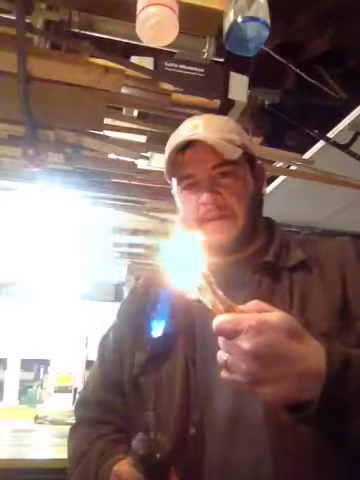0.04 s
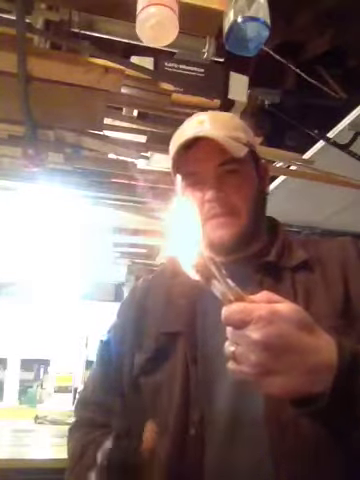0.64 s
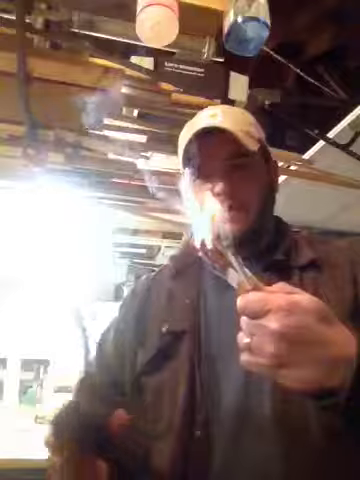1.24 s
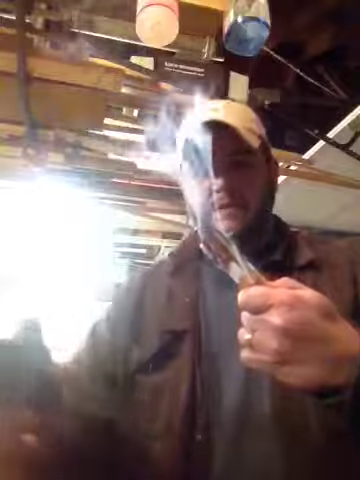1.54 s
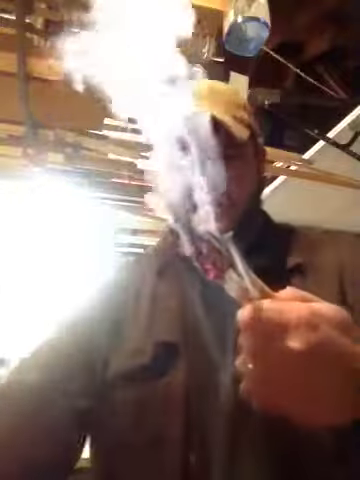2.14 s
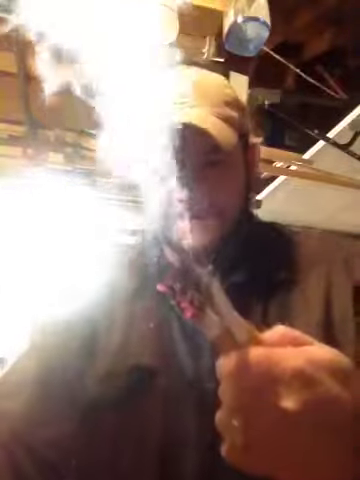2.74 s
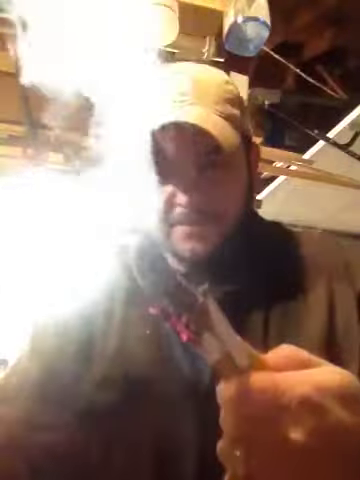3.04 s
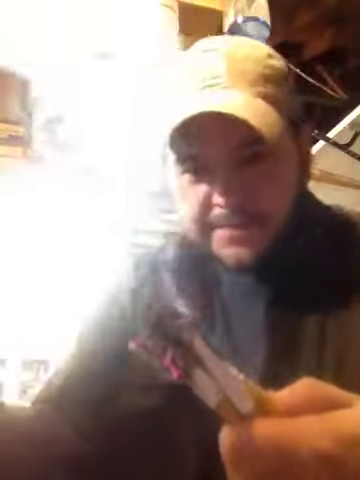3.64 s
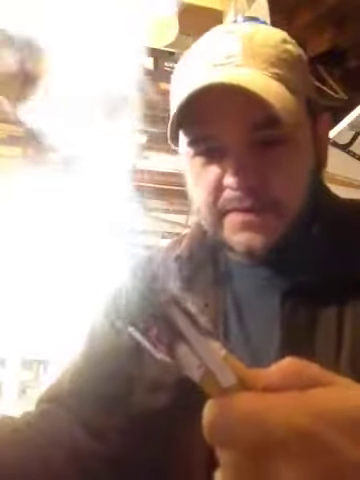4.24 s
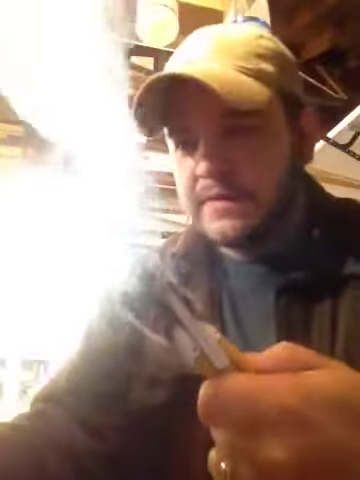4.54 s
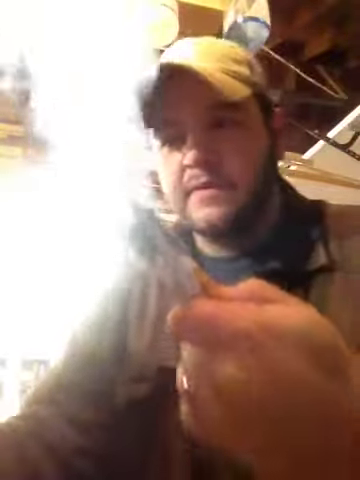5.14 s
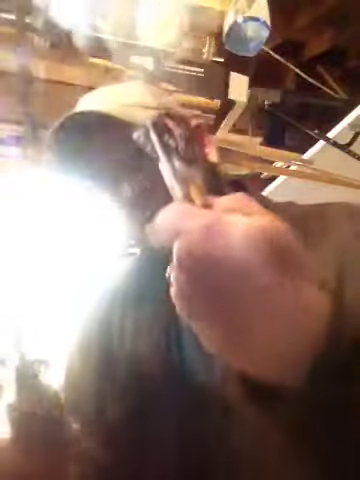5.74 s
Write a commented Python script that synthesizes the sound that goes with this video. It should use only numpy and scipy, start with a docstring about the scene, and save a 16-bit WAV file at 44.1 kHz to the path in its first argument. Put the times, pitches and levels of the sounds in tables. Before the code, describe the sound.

Close to a small microphone in a workshop, a gas torch hisses and roars for about a second, then stops with a sharp click and a brief sputter. Its metal bottle knocks down on a bench and rings briefly. A quiet stretch follows, with faintly whistling unlit gas and a few soft taps. Near the end, a knock and another sharp click bring the hissing flame back.

```python
"""A hand-held gas torch roars in a small workshop: turbulent flame below, jet hiss above.
A reflection from a nearby surface sweeps the colour of the roar as the torch is moved.
At 0.96 s the valve snaps shut; the flame pops, sputters and dies. At 2 s the steel bottle is stood
on the bench and rings. Unlit gas hisses on, faintly whistling, among small handling knocks.
At 4.78 s the igniter snaps and the flame is back."""
import sys
import numpy as np
from scipy import signal
from scipy.fft import rfft, irfft
from scipy.io import wavfile
from scipy.ndimage import uniform_filter1d

SR = 44100
rng = np.random.default_rng(int(sys.argv[2]) if len(sys.argv) > 2 else 0)


def persist_wave(psi):
    """Save psi, clipped to +-1, as 16-bit WAV."""
    counts = np.round(np.clip(psi, -1, 1) * 32767).astype(np.int16)
    wavfile.write(sys.argv[1], SR, np.atleast_2d(counts).T)


N = 254932
T = np.arange(N) / SR
HZ = np.maximum(np.fft.rfftfreq(N, 1 / SR), 1)
SHUT_S, SET_DOWN_S, RELIT_S = 0.96, 2.0155, 4.777

# flame spectra, torch lifted and lowered: f/Hz, level/dB
LIFTED_SPECTRUM = [(40, -8), (90, -32.5), (170, -12.5), (280, 1.5), (390, -14.5), (500, -5), (620, -4),
                   (900, 1), (1200, -6), (2600, -13), (4400, -6.5), (8700, -12.5), (10200, -23.5),
                   (15000, -34)]
LOWERED_SPECTRUM = [(40, -27), (90, -31), (180, -5.5), (290, -3), (390, -8.5), (540, 7), (780, 0),
                    (1000, -3), (2100, -3.5), (2700, -5.5), (4400, -8.5), (8400, -16), (10200, -23),
                    (15000, -29)]
# flame peaks and dips, of the burner and of each position: f/Hz, width/Hz, gain/dB
BURNER_PEAKS = [(3293, 164, 8.5), (3690, 200, 3), (4660, 200, 3.5), (5090, 490, -6.5), (6770, 250, 1),
                (8900, 300, -0.5), (11620, 900, 4)]
LIFTED_PEAKS = [(1500, 130, -1.5), (1570, 182, 8.5), (2800, 200, -1.5), (3300, 97, -15.5), (5020, 140, -2)]
LOWERED_PEAKS = [(1330, 150, -2), (2244, 310, 8), (5770, 440, -12)]
# near reflection as the torch swings in each burn: t/s, lag/ms
FIRST_SWING = [(0, 1.11), (0.12, 1.06), (0.3, 0.97), (0.6, 0.95), (0.75, 0.858), (0.94, 0.86)]
SECOND_SWING = [(4.8, 0.65), (5.0, 0.7), (5.16, 0.73), (5.34, 0.65), (5.43, 0.69), (5.59, 0.91),
                (5.78, 0.94)]
# hiss swells, nozzle towards the listener: t/s, half length/s, gain/dB
SWISHES = [(0.047, 0.21, 2.5), (0.8, 0.14, 2.5), (5.172, 0.045, 1.5), (5.408, 0.11, 1.5)]

# valve and igniter snaps: t/s, crack/dB, ring/dB, pop/dB
SNAPS = [(0.9549, -8.5, -29.5, -20), (4.7806, -10, -49, -29)]
# trigger clicks: t/s, click/dB, ring/dB
CLICKS = [(1.099, -42.5, -80), (1.1267, -27, -48), (4.961, -26.5, -66)]
# bottle rocking on the bench: t/s, level/dB
ROCKING = [(2.0185, 3), (2.031, 1), (2.062, -4.5)]
# handling knocks: t/s, level/dB, resonance/Hz, t60/s
KNOCKS = [(2.30, -52, 269, 0.086), (2.438, -57, 2500, 0.046), (2.632, -47.5, 1560, 0.026),
          (2.954, -55, 625, 0.08), (3.301, -48.5, 748, 0.056), (3.416, -49, 814, 0.037),
          (3.42, -50.5, 220, 0.12), (3.466, -50.5, 260, 0.16), (3.495, -55, 656, 0.055),
          (4.708, -37, 1500, 0.037), (4.711, -38, 738, 0.062), (4.762, -48, 906, 0.099)]
# rubs and spits: t/s, half length/s, level/dB, f/Hz, half width/Hz
RUBS = [(0.776, 0.011, -42.5, 12300, 704), (3.064, 0.04, -55.5, 2400, 2000)]
# impact spectra: f/Hz, level/dB
SNAP_SPECTRUM = [(50, -39), (200, -20.5), (900, -4), (1500, 0), (2600, -5.5), (4000, -2.5), (5800, 0.5),
                 (7400, -3), (8800, 0.5), (10500, -8), (14500, -12)]
CLICK_SPECTRUM = [(150, -36), (400, -17.5), (800, -10.5), (1350, -1), (2400, -9), (4600, -5.5),
                  (7000, -9.5), (11000, -18), (15000, -33)]
CONTACT_SPECTRUM = [(40, -40), (130, -12), (300, 0), (700, 8), (1100, 0), (1700, 7.5), (2800, -6.5),
                    (4200, 8), (6500, -11), (10000, -11.5), (15000, -42)]
BENCH_SPECTRUM = [(60, -36), (150, -11.5), (230, -5), (305, 2.5), (390, -17), (650, -13.5), (1200, -41),
                  (4000, -44)]
KNOCK_SPECTRUM = [(100, -27), (230, 5.5), (450, -3.5), (800, -1.5), (1600, -0.5), (2400, -14), (4500, -6.5),
                  (12000, -35)]
# modes of the struck parts and the flame's pop: f/Hz, level/dB, t60/s
VALVE_MODES = [(3640, -3.5, 0.25), (3660, -8.5, 0.42), (5100, -11, 0.24), (5970, -9, 0.18),
               (7100, -3, 0.16), (9450, -8.5, 0.18)]
SPRING_MODES = [(3260, 2.5, 0.52), (3450, -11, 0.74), (3380, -11, 0.74), (4700, 3, 0.15), (7800, -14, 0.25)]
BOTTLE_MODES = [(241, -11.5, 0.64), (289, -3.5, 0.35), (494, -27, 0.84), (1003, -16.5, 1.9),
                (2130, -29, 1.5), (3305, -19, 0.38), (5389, -15, 0.22)]
POP_MODES = [(172, -13.5, 0.044), (186, -13, 0.207), (242, 9, 0.032), (304, -3.5, 0.053), (485, 4, 0.027)]

# unlit gas spectrum: f/Hz, level/dB
LEAK_SPECTRUM = [(300, -22), (700, -13), (1500, -12), (2000, -16.5), (3200, -12), (3800, -6.5),
                 (4500, -7.5), (6200, -2.5), (7200, 1), (8400, 0), (9400, -7), (12000, -8.5), (13500, -9),
                 (15000, -19.5)]
# peaks and dips of the open tube: f/Hz, width/Hz, gain/dB
TUBE_PEAKS = [(6470, 230, -3), (7580, 302, 1), (8240, 210, 1), (10670, 440, 4.5), (10800, 230, -13.5),
              (11580, 500, 6)]
# tube whistles: f/Hz, half width/Hz, level/dB, waver/dB
WHISTLES = [(1242, 61, -67, 1.7), (2492, 69, -71, 2.4), (3783, 93, -68, 2.5), (5390, 83, -75, 3)]
# still workshop air: f/Hz, level/dB
AIR_SPECTRUM = [(25, -5.5), (60, 14.5), (110, 1), (170, 2.5), (260, -5.5), (420, -9), (800, -12),
                (2000, -41)]


def flame(flutter_db=0.77, flicker_db=0.5, crossover_hz=4000, lift_per_ms=1.25):
    """Turbulent roar and jet hiss; level, colour and reflection follow the torch's position."""
    lag_ms, = curve(FIRST_SWING + SECOND_SWING)
    base_lift = np.where(T < RELIT_S, 0.72, 0.2)  # 0 lowered, 1 lifted
    lift = np.clip(base_lift + lift_per_ms * (lag_ms - 0.8), 0, 1)
    flame_db = -34.5 + 3.5 * lift
    swish_db = sum(db * swell(s, half_s) for s, half_s, db in SWISHES)
    jet_db = -4.5 - 5.5 * lift + swish_db  # relative to the roar
    lifted = colour(noise(), LIFTED_SPECTRUM, BURNER_PEAKS + LIFTED_PEAKS)
    lowered = colour(noise(), LOWERED_SPECTRUM, BURNER_PEAKS + LOWERED_PEAKS)
    lowered = lowered + 0.3 * echo(lowered, lag_ms / 5)  # very short bounce: broad swish
    turbulence = rfft(np.sqrt(lift) * unit(lifted) + np.sqrt(1 - lift) * unit(lowered))
    lowpass = 1 / (1 + (HZ / crossover_hz) ** 8)
    roar = steady(irfft(turbulence * lowpass, N)) * undb(flutter_db * wander(35))
    jet = steady(irfft(turbulence * (1 - lowpass), N)) * undb(jet_db + flicker_db * wander(70))
    direct = (roar + jet) * undb(flame_db) * gas_feed()
    near = 0.44 * echo(direct, lag_ms)
    far = 0.2 * echo(direct, 1.93 + 0.015 * wander(1.5))
    return direct + near + far


def gas_feed(sputter_s=1.012, sputter_db=-2, catch_s=0.008):
    """Gas reaching the flame: steady, cut off, one sputter, steady again."""
    first_burn = (T < SHUT_S) + fade(SHUT_S, t60_s=0.087)
    sputter = (T < sputter_s) * swell(sputter_s, half_s=0.015) + fade(sputter_s, t60_s=0.085)
    return first_burn + undb(sputter_db) * sputter + ramp(RELIT_S, catch_s)


def snaps(chatter_s=0.00053, rattle_db=-21, pop_lag_s=0.0025):
    """The catch chatters and rings the valve; the flame pops just after."""
    out = 0
    for s, crack_db, ring_db, pop_db in SNAPS:
        chatter = (T >= s) * (T < s + chatter_s)
        force = chatter + fade(s + chatter_s, t60_s=0.026) + undb(rattle_db) * fade(s, t60_s=0.091)
        out += undb(crack_db) * colour(noise() * force, SNAP_SPECTRUM)
        out += undb(ring_db) * ring(s, VALVE_MODES)
        out += undb(pop_db) * ring(s + pop_lag_s, POP_MODES)
    return out


def bottle_set_down(crack_db=-23, rattle_db=-38, thud_db=-31, ring_db=-34):
    """Hard contact and rattle; the steel bottle rings and rocks, thudding on the bench."""
    force = undb(crack_db) * fade(SET_DOWN_S, t60_s=0.023)
    force += undb(rattle_db) * fade(SET_DOWN_S, t60_s=0.15)
    thuds = sum(undb(thud_db + db) * fade(s, t60_s=0.083) for s, db in ROCKING)
    contact = colour(noise() * force, CONTACT_SPECTRUM)
    bench = colour(noise() * thuds, BENCH_SPECTRUM)
    return contact + bench + undb(ring_db) * ring(SET_DOWN_S + 0.0027, BOTTLE_MODES)


def trigger_clicks(t60_s=0.047):
    """The trigger clicks; its spring rings on."""
    force = sum(undb(db) * fade(s, t60_s) for s, db, _ in CLICKS)
    spring = sum(undb(db) * ring(s, SPRING_MODES) for s, _, db in CLICKS)
    return colour(noise() * force, CLICK_SPECTRUM) + spring


def knocks(peak_db=9, tock_db=4):
    """Dull handling blows, each with one hollow resonance."""
    out = 0
    for s, db, hz, t60_s in KNOCKS:
        blow = colour(noise() * fade(s, t60_s), KNOCK_SPECTRUM, [(hz, hz / 3, peak_db)])
        tock = ring(s, [(hz, tock_db, t60_s)])
        out += undb(db) * (blow + tock)
    return out


def gas_leak(hiss_db=-53, flicker_db=0.75, dip_db=-0.2, swell_db=2.5):
    """Unlit gas hisses throughout; the open tube starts whistling after shut-off. Both follow the flow."""
    flow_db = dip_db * swell(1.27, half_s=0.16) + swell_db * swell(2.68, half_s=0.94)
    hiss = unit(colour(noise(), LEAK_SPECTRUM, TUBE_PEAKS)) * undb(hiss_db + flicker_db * wander(10))
    whistles = sum(band(hz, half_hz) * undb(db + waver_db * wander(2.2))
                   for hz, half_hz, db, waver_db in WHISTLES)
    return (hiss + whistles * ramp(1.15, rise_s=0.16)) * undb(flow_db)


def rubs():
    """Brief rubs and spits: soft swells of band noise."""
    return sum(band(hz, half_hz) * undb(db) * swell(s, half_s) for s, half_s, db, hz, half_hz in RUBS)


def grip_taps(centre_s=3.15, spread_s=0.5, level_db=-62, scatter_db=2, count=8):
    """Faint random taps as the hand shifts its grip."""
    taps = rng.uniform(-0.89, 1, (count, 2))
    force = sum(undb(level_db + scatter_db * size) * fade(centre_s + spread_s * when, t60_s=0.05)
                for when, size in taps)
    return colour(noise() * force, KNOCK_SPECTRUM)


def workshop(x, wet_db=-19.5, t60_s=0.37, predelay_s=0.0069):
    """Cluttered room: adds a short, dull tail."""
    tail = colour(noise() * fade(predelay_s, t60_s), [(200, 0.5), (2000, -2.5), (12000, -10.5)])
    return x + undb(wet_db) * signal.fftconvolve(x, tail / np.linalg.norm(tail))[:N]


def still_air(level_db=-66.5):
    """Low, steady room noise."""
    return undb(level_db) * colour(noise(), AIR_SPECTRUM)


def colour(x, spectrum, peaks=()):
    """Minimum-phase filter from a spectrum plus peaks; white noise keeps its level."""
    hz, db = np.transpose(spectrum)
    db = np.interp(np.log(HZ), np.log(hz), db)
    for centre_hz, width_hz, gain_db in peaks:
        db = db + gain_db / (1 + (2 * (HZ - centre_hz) / width_hz) ** 2)
    cepstrum = irfft(np.log(unit(undb(db))), N)
    cepstrum[1:N // 2] *= 2
    cepstrum[N // 2 + 1:] = 0
    return irfft(rfft(x) * np.exp(rfft(cepstrum)), N)


def ring(start_s, modes):
    """Sum of decaying sines."""
    return sum(undb(db) * fade(start_s, t60_s) * np.sin(2 * np.pi * hz * (T - start_s))
               for hz, db, t60_s in modes)


def echo(x, lag_ms):
    """Variable delay, oversampled to keep the treble."""
    fine = signal.resample_poly(x, 4, 1)
    return np.interp(T - lag_ms / 1000, np.arange(4 * N) / (4 * SR), fine)


def noise():
    """White noise, rms 1."""
    return rng.standard_normal(N)


def band(hz, half_hz):
    """Band noise, rms 1."""
    return unit(irfft(rfft(noise()) / (1 + ((HZ - hz) / half_hz) ** 2), N))


def wander(rate_hz):
    """Smooth random drift, rms 1."""
    return unit(irfft(rfft(noise()) / (1 + (HZ / (rate_hz + 1)) ** 4), N))


def fade(start_s, t60_s):
    """Silence, then exponential decay."""
    age_s = T - start_s
    return (age_s >= 0) * np.exp(-np.log(1000) * np.clip(age_s / t60_s, 0, 10))


def swell(centre_s, half_s):
    """Gaussian bump, peak 1."""
    return np.exp(-((T - centre_s) / half_s) ** 2)


def ramp(start_s, rise_s):
    """Linear rise from 0 to 1, then held."""
    return np.clip((T - start_s) / rise_s, 0, 1)


def curve(rows):
    """Table columns, interpolated in time."""
    s, *columns = np.transpose(rows)
    return [np.interp(T, s, column) for column in columns]


def steady(x):
    """Scale to rms 1 over a sliding 0.5 s."""
    return x / np.sqrt(uniform_filter1d(x ** 2, size=SR // 2))


def unit(x):
    """Scale to rms 1."""
    return x / np.sqrt(np.mean(x ** 2))


def undb(db):
    """Decibels to gain."""
    return 10 ** (np.asarray(db) / 20)


def scene():
    """Torch and handling in the room, over still air; mono."""
    torch = flame() + gas_leak() + snaps() + trigger_clicks()
    handling = bottle_set_down() + knocks() + grip_taps() + rubs()
    return (workshop(torch + handling) + still_air())[None]


def record(dry, bass_hz=135, top_hz=15300):
    """Small microphone: bass loss, rounded peaks, top cut."""
    highpass = signal.butter(4, bass_hz, "high", fs=SR, output="sos")
    lowpass = signal.ellip(12, .2, 80, top_hz, fs=SR, output="sos")
    rounded = np.tanh(signal.sosfilt(highpass, dry))
    return signal.sosfilt(lowpass, rounded)


dry = scene()
out = record(dry)
persist_wave(out)
```